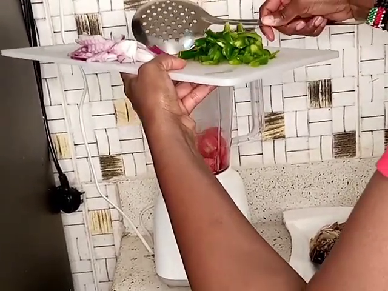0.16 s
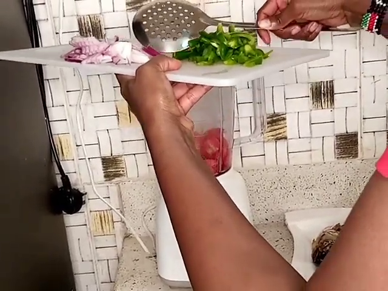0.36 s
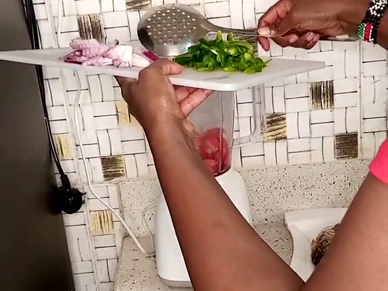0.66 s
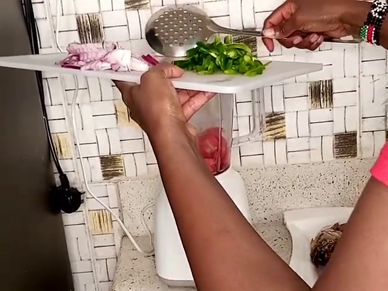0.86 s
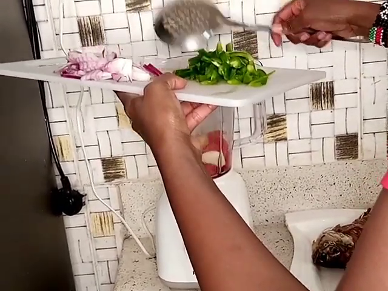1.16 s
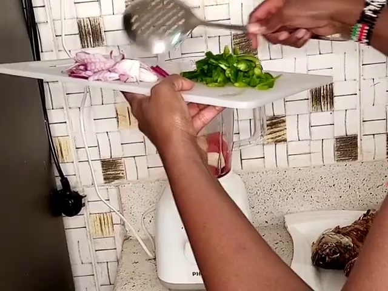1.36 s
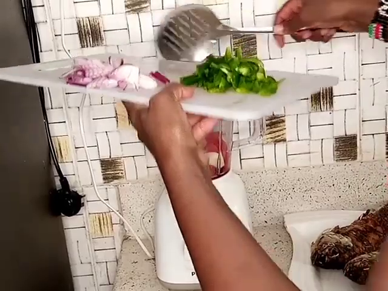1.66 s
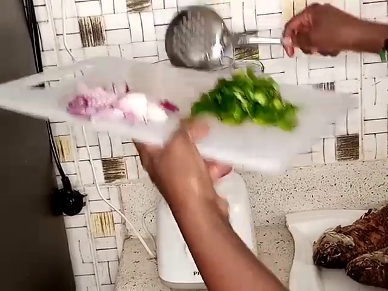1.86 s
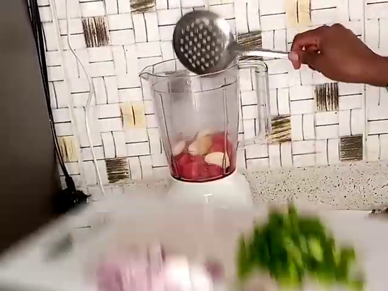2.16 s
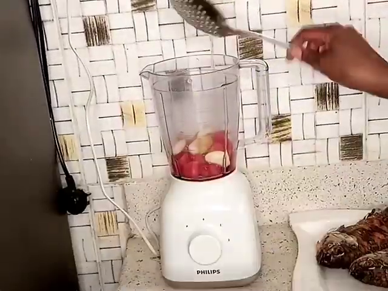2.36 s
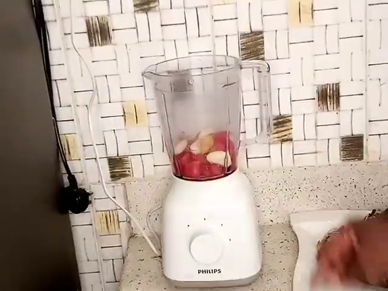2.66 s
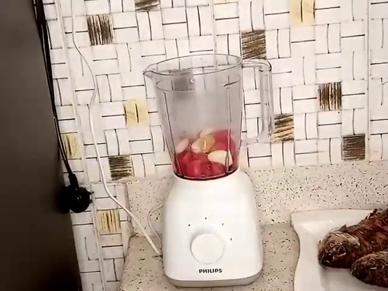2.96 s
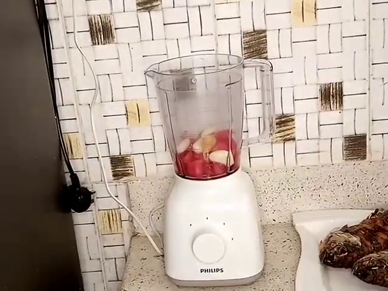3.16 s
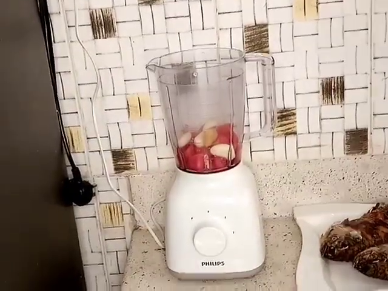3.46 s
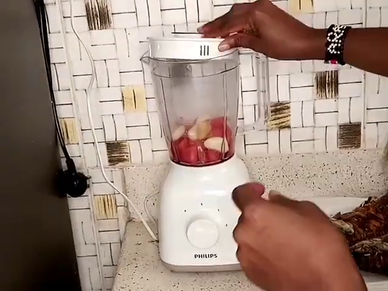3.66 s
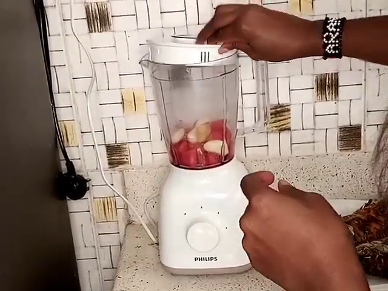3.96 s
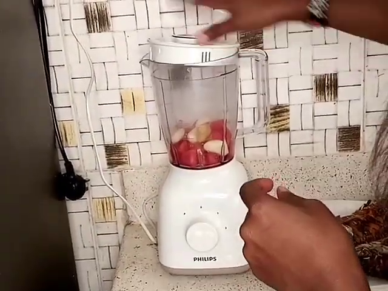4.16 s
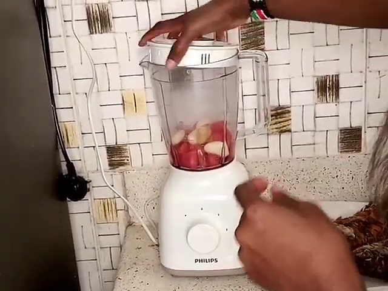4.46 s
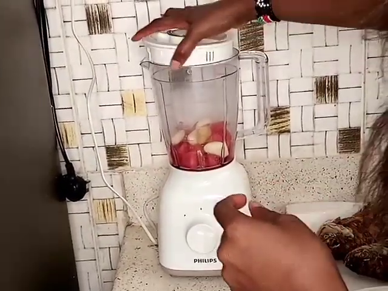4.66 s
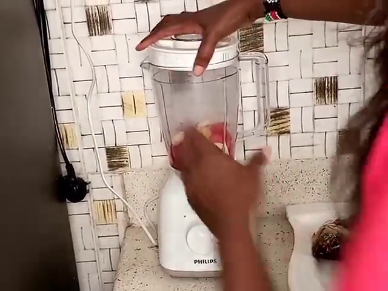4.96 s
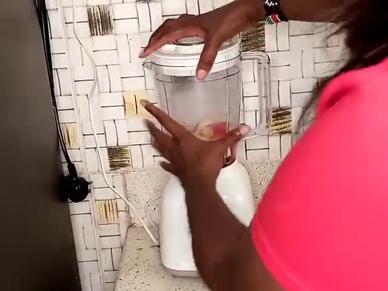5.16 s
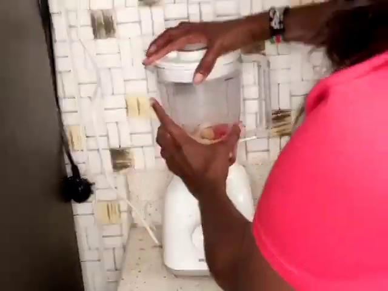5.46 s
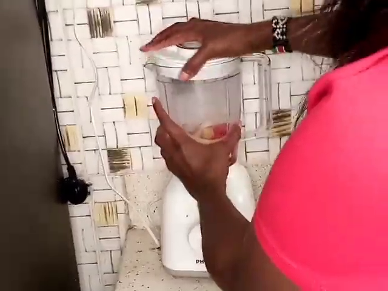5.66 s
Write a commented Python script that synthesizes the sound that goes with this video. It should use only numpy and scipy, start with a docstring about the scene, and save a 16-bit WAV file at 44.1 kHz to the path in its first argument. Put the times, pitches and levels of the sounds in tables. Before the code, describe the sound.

Gritty scrapes and ringing steel, sharp counter knocks, hollow lid fumbling and booms, a tiny silence, then a loud blender at full speed.

```python
"""A steel skimmer pushes chopped vegetables off a plastic board into a blender jar in a small tiled kitchen:
friction grit excites hiss, board modes and singing steel, and food ticks on the jar wall. Board and skimmer
are put down as impulses into damped modes; the lid is picked up and pressed on and the jar gripped, with
rustling noise and a booming air column. After a short silent gap the motor is already at full speed: shaft
orders over throbbing noise. Before the gap, room tone, hum and a diffuse tail lie beneath."""
import sys
import numpy as np
from scipy import signal
from scipy.fft import rfft, irfft
from scipy.io import wavfile

SR = 44100
rng = np.random.default_rng(int(sys.argv[2]) if len(sys.argv) > 2 else 0)


def wrap_up_sound(samples):
    """Save the sound to the file named by the first command line argument, as 16-bit audio."""
    columns = np.atleast_2d(samples).T
    # keep every value between -1 and 1, then stretch to whole-number steps
    tamed = np.clip(columns, -1, 1)
    steps = np.round(tamed * 32767).astype(np.int16)
    wavfile.write(sys.argv[1], SR, steps)


N = 256662
T = np.arange(N) / SR
STEP = 16   # samples between points of a coarse envelope
GAP_START_S, MOTOR_START_S = 5.638, 5.664   # silence lies between these times


def amp(db):
    """Decibel definition: amplitude ratio of a level difference."""
    return 10 ** (np.asarray(db) / 20)


def rms_one(x):
    """Power normalisation: scales x to an rms of 1."""
    return x / np.sqrt(np.mean(x ** 2) + 1e-20)


def at_hz(points, hz):
    """Logarithmic frequency scale: interpolates a table of (f/Hz, value)."""
    f, value = np.array(points).T[:2]
    return np.interp(np.log(hz + 1), np.log(f), value)


def coloured(x, spectrum):
    """Linear filtering: weights the spectrum of x by a table; rms 1."""
    hz = np.fft.rfftfreq(N, 1 / SR)
    return rms_one(irfft(rfft(x) * amp(at_hz(spectrum, hz)), N))


def grit(per_s, spread_db):
    """Stick-slip friction: random uneven clicks of two surfaces catching on each other."""
    size_db = spread_db * np.minimum(rng.exponential(1, N), 4)
    sizes = amp(size_db) * rng.choice([-1, 1], N)
    return sizes * (rng.random(N) < per_s / SR)


def drift(rate):
    """Low-pass random process: slow chance of about the given rate in Hz, spread 1."""
    r = np.exp(-2 * np.pi * rate / SR)
    slow = signal.lfilter([1], [1, -2 * r, r * r], rng.standard_normal(N + SR))
    return rms_one(slow[SR:])   # the settling of the filter is left out


def resonances(x, peaks, waver_db=0., rate=9.3):
    """Modal superposition: parallel resonances that waver independently in level; rms 1."""
    out = 0
    for k, (hz, width, db) in enumerate(peaks):
        r = np.exp(-np.pi * width / SR)
        poles = [1, -2 * r * np.cos(2 * np.pi * hz / SR), r * r]
        mode = rms_one(signal.lfilter([1, 0, -1], poles, x))
        out = out + (-1) ** k * amp(db + waver_db * drift(rate)) * mode   # alternating signs
    return rms_one(out)


def narrow(hz, width_hz, size=N):
    """Amplitude modulation: slow complex noise on a carrier whose pitch may move; rms 1."""
    r = np.exp(-np.pi * width_hz / SR)
    slow = signal.lfilter([1], [1, -2 * r, r * r], rng.standard_normal((2, size + 2000)))[:, 2000:]
    phase = 2 * np.pi * np.cumsum(hz * np.ones(size)) / SR
    return rms_one(slow[0] * np.cos(phase) + slow[1] * np.sin(phase))


def patchy(x, patchy_db, rate):
    """Subband modulation: half-octave bands swell and fade independently; rms 1."""
    edges = 350 * 2 ** np.arange(0, 6, .5)
    out = 0
    for k, (low, high) in enumerate(zip(edges, edges[1:])):
        band = signal.sosfilt(signal.butter(2, [low, high], "band", fs=SR, output="sos"), x)
        out = out + (-1) ** k * band * amp(patchy_db * drift(rate))   # signs avoid gaps between bands
    return rms_one(out)


def swells(s, db, rise_s, fall_s):
    """Exponential growth and decay: one coarse gain row per event, times being those per 20 dB."""
    late = T[::STEP] - s[:, None]
    drop = np.maximum(-late / rise_s[:, None], late / fall_s[:, None])
    return amp(db[:, None] - 20 * np.minimum(drop, 8))


def fine(coarse):
    """Linear interpolation: brings a coarse envelope to full rate."""
    return np.interp(T, T[::STEP], coarse)


# skimmer pressure in each stroke over the board, as a list per stroke: [t/s, relative hiss level/dB]
DRAG_PRESSURE = [
    [(0.139, -52), (0.237, -51.5), (0.345, -62), (0.473, -72), (0.483, -68)],
    [(0.489, -60), (0.509, -64), (0.571, -56.5), (0.819, -49.5), (0.947, -55.5), (0.966, -49)],
    [(0.972, -40), (1.002, -51), (1.038, -48.5), (1.13, -70)],
    [(1.459, -35.5), (1.497, -42), (1.563, -29.5), (1.6, -29), (1.643, -32.5), (1.72, -49), (1.84, -75)],
]
# colour of each stroke: [board drone relative level/dB, extra drone level on landing/dB,
# steel ring relative level/dB]
STROKE_COLOURS = [(9, -8, -1), (8, 7, 1), (5, 0.1, 0.1), (-13, 24, -3)]
# vibration modes of the plastic board, also rung by the board taps: [f/Hz, relative level/dB, t60/s]
BOARD_MODES = [(220, -4.5, 0.2), (283, -3.5, 0.17), (441, -3, 0.18), (552, -2, 0.077), (733, -1, 0.45),
               (1041, -5.5, 0.11), (1309, -3.5, 0.037), (1976, -14.5, 0.091), (4080, 2, 0.021),
               (5800, 6, 0.017)]
# singing modes of the steel skimmer: [f/Hz, width/Hz, relative level/dB]
SKIMMER_MODES = [(3010, 49, -14), (3460, 40, -13), (4190, 120, -6), (4450, 120, -6), (5800, 90, -9),
                 (6370, 90, -8), (7076, 20, 0), (8100, 25, -10), (8610, 41, -14), (10100, 22, -1),
                 (11100, 60, -12), (12500, 30, -13), (12800, 35, -14), (13300, 40, -13)]
# spectrum of the scraping hiss: [f/Hz, relative level/dB]
DRAG_HISS_SPECTRUM = [(300, -50), (900, -2), (2000, -0.5), (3000, -4), (4500, 0.5), (6500, -1.5),
                      (9600, -7), (11500, -14), (12900, -10), (14000, -11), (15600, -4.5)]
# spectrum of dull rubbing, also heard in handling: [f/Hz, relative level/dB]
DULL_SPECTRUM = [(350, -22.5), (500, 4), (1000, 2.5), (2200, -2), (3000, -25.5)]


def drags():
    """Friction excitation: dense grit drives broad hiss, the skimmer's modes and the board's low modes."""
    points = np.concatenate(DRAG_PRESSURE)
    touching = sum((T >= stroke[0][0]) & (T <= stroke[-1][0]) for stroke in DRAG_PRESSURE) > 0
    gain = touching * amp(np.interp(T, points[:, 0], points[:, 1]))

    starts = np.array([stroke[0][0] for stroke in DRAG_PRESSURE])
    which = np.clip(np.searchsorted(starts, T) - 1, 0, None)
    since = np.maximum(T - starts[which], 0)
    drone_db, landing_db, ring_db = np.array(STROKE_COLOURS)[which].T
    drone_db = drone_db + landing_db * np.exp(-since / .05)   # the landing drone dies away
    ring_db = ring_db - 14 * np.exp(-since / .035)   # the steel takes time to sing

    rub = grit(12000, spread_db=2.5)
    middle_modes = [(hz, 35, db) for hz, db, t60 in BOARD_MODES if 500 < hz < 2500]
    low_modes = [(hz, 60, db) for hz, db, t60 in BOARD_MODES if hz < 500]
    drone = amp(-5.0) * resonances(rub, middle_modes, waver_db=2.5)
    drone += amp(-15) * coloured(rub, DULL_SPECTRUM)
    drone += amp(-9) * resonances(rub, low_modes, waver_db=2.5)
    hiss = coloured(rub * amp(1.3 * drift(26)), DRAG_HISS_SPECTRUM)

    # the steel rings on when pressure eases: it takes 0.7 of the dB swing about -52 dB
    ring_gain = amp(-52 + ring_db) * (gain / amp(-52)) ** .7
    ring = ring_gain * resonances(rub, SKIMMER_MODES, waver_db=2.4, rate=7.1)
    # the board's body tone only speaks under hard pressure: 2.4 times the dB swing about -29 dB
    tone_gain = amp(-35) * (gain / amp(-29)) ** 2.4
    tone = tone_gain * narrow(1095, width_hz=136)
    return amp(-3.5) * (gain * (hiss + amp(drone_db) * drone) + ring + tone)


# shaft orders: [multiple of shaft speed, level/dB relative to a sine of rms 1]
SHAFT_ORDERS = [(1, -33), (2, -33), (3, -46), (6, -45), (12, -40.5), (24, -36), (36, -37.5)]
# spectrum of the churning noise: [f/Hz, relative level/dB]
CHURN_SPECTRUM = [(15, -60), (25, -34), (87, -40), (242, -18), (285, -10.5), (373, -18), (531, -15),
                  (575, -18), (695, -19), (1700, -13.5), (1940, -11), (3080, -14.5), (6920, -14.5),
                  (7920, -17.5), (16000, -19)]
# motor housing and jar resonances: [f/Hz, width/Hz, relative level/dB]
HOUSING_MODES = [(1935, 30, -4), (2787, 14, -7), (3327, 16, -9), (4133, 14, -8), (5767, 25, -6),
                 (6550, 22, -3), (6900, 300, 5), (7060, 30, -6), (10270, 100, -6)]


def motor():
    """Rotating machinery: shaft orders (unbalance, blades, commutator bars) over noise throbbing once a turn."""
    shaft_hz = 284.2 * (1 + 0.00287 * drift(17.1))
    turns = np.cumsum(shaft_hz) / SR
    tones = 0
    for order, db in SHAFT_ORDERS:
        wave = np.sin(2 * np.pi * (order * turns + rng.random()))
        tones = tones + np.sqrt(2) * amp(db + 1.8 * drift(37)) * wave
    tones += amp(-38.5) * narrow(2006, width_hz=16)   # steady whine, no multiple of the shaft speed
    throb = 1 + 0.25 * np.cos(2 * np.pi * turns)
    chop = grit(16000, spread_db=0.0) * throb * amp(1.86 * drift(45))
    housing = resonances(grit(9000, spread_db=1.5) * throb, HOUSING_MODES)
    churn = coloured(chop, CHURN_SPECTRUM) + amp(-8.5) * housing
    return tones + amp(-21.5) * churn


def blows(events, modes, ring_db, crack_db, crack_s=0.002):
    """Impulse response: each blow rings damped modes and adds a short noise crack in each range."""
    s, treble_db, middle_db, bass_db = np.transpose(events)
    at, out = (s * SR).astype(int), np.zeros(N)
    by_range = {(150, 600): treble_db + bass_db, (600, 2500): treble_db + middle_db, (2500, 15000): treble_db}
    for (low, high), db in by_range.items():
        clicks = np.full(N, 1e-18)
        clicks[at] = amp(db)
        fall = np.exp(-1 / (crack_s * SR * np.sqrt(2500 / low)))   # bass cracks last longer
        burst = signal.lfilter([1], [1, -fall], clicks) * rng.choice([-1, 1], N)
        band = signal.butter(3, [low, high], "band", fs=SR, output="sos")
        bandwidth_gain = np.sqrt(SR / 2 / (high - low))
        out += amp(crack_db) * bandwidth_gain * signal.sosfilt(band, burst)
        for hz, mode_db, t60 in modes:
            if low <= hz < high:
                r, w = amp(-60 / (t60 * SR)), 2 * np.pi * hz / SR
                uneven_db = rng.normal(0, 2, len(at))   # each blow excites a mode differently
                clicks[at] = amp(db + mode_db + ring_db + uneven_db)
                out += signal.lfilter([0, np.sin(w)], [1, -2 * r * np.cos(w), r * r], clicks)
    return out


# all tap tables: [t/s, treble reference level/dB, middle relative level/dB, bass relative level/dB]
# all mode tables: [f/Hz, relative level/dB, t60/s]
# blows on the board
BOARD_BLOWS = [(0.1402, -45, -0.5, -0.5), (0.4866, -49, -1, 10), (0.9694, -37.5, -17, 3),
               (1.251, -58.5, 6.5, 12.5), (1.4569, -34, -1.5, -0.5)]
# a blow on the rim, and the rim's modes
RIM_BLOWS = [(2.0582, -27.5, 4, -2.5)]
RIM_MODES = [(524, -3, 0.17), (543, -3, 0.13), (688, -2, 0.19), (1110, -10, 0.042), (1214, 3, 0.069),
             (1265, 3, 0.054), (1340, -4, 0.054), (1750, -8, 0.085), (2930, -24, .02), (4220, 7.5, 0.016),
             (5540, 5, 0.026)]
# blows on the counter, and the counter's modes
COUNTER_BLOWS = [(2.644, -31.5, -33.5, -18), (2.886, -12, -49, -46.5), (2.8873, -17.5, -18, -38),
                 (2.9316, -9, -25, -43), (2.9389, -14.5, -28, -41)]
COUNTER_MODES = [(330, 0, .1), (650, -13, .12), (715, 1.5, 0.18), (757.5, 6, 0.19), (1370, -2, .05),
                 (2980, -18, .006), (4830, -14.5, .005), (6830, 1.5, 0.011), (9000, 2.5, 0.006)]
# small bright ticks of food dropping into the jar, and the modes of the jar wall
FOOD_DROPS = [(1.1456, -47.5, -42, -40), (1.1563, -43, -40, -42), (1.1856, -42, -38, -40),
              (1.2207, -49, -18, -47), (1.2844, -58, -40, -42)]
JAR_WALL_MODES = [(4530, -7, .012), (5350, 0.5, 0.015), (6400, 4, .012), (7640, -2, .012),
                  (8900, -11, .012)]
# blows as the lid is picked up, and the modes of the loose lid
PICKUP_BLOWS = [(3.3443, -38, -5, -12), (3.3572, -33.5, 8, -22.5), (3.3823, -24.5, -15.5, -17),
                (3.493, -13.5, -24, -20.5)]
LOOSE_LID_MODES = [(315, -2, 0.14), (980, -7, 0.029), (1030, 2, 0.044), (1150, -10, 0.058),
                   (1406, -1.5, 0.14), (2090, -14.5, 0.045), (3140, -2, 0.011), (5740, 0.5, 0.012),
                   (7100, -14.5, 0.0091)]
# blows on the lid as it is pressed on, and its modes
LID_BLOWS = [(3.7549, -43, -11, -9.5), (3.966, -45.5, -10.5, -7), (4.1783, -43, -19, -6.5),
             (4.2427, -56, -5, 11), (4.271, -45.5, -8.5, -6.5), (4.4805, -54, -24, -21),
             (4.5062, -41.5, -28.5, -6.5), (4.5307, -28.5, -7.5, -16), (4.5729, -35, -12, -22),
             (4.6725, -34, -18, -5.5), (4.8064, -42, 10.5, -13), (4.8857, -35, 4, -5),
             (4.9046, -35.5, -0.5, 1.5), (5.03, -32.5, -12, -12.5), (5.1898, -42.5, -18, -2.5),
             (5.2728, -40, -4.5, -8), (5.3848, -45.5, -8, -2.5)]
LID_MODES = [(255, 3.5, 0.14), (284.3, -6.5, 0.069), (390, 0.5, 0.22), (630, -2.5, 0.071),
             (1048, -12, 0.063), (1410, -14, 0.26), (1637, -15, 0.072), (2110, -19, 0.031),
             (3610, -13, 0.011), (4790, -4.5, 0.021), (6100, -10, 0.06)]


def knocks():
    """Impact excitation: every struck body answers with its own modes."""
    out = blows(BOARD_BLOWS, BOARD_MODES, ring_db=-10, crack_db=-2.5)
    out += blows(RIM_BLOWS, RIM_MODES, ring_db=-14, crack_db=-8.5)
    out += blows(COUNTER_BLOWS, COUNTER_MODES, ring_db=-9, crack_db=-5.5, crack_s=.0012)
    out += blows(FOOD_DROPS, JAR_WALL_MODES, ring_db=-11, crack_db=-11.5, crack_s=.004)
    out += blows(PICKUP_BLOWS, LOOSE_LID_MODES, ring_db=-10, crack_db=-6.5, crack_s=0.0017)
    out += blows(LID_BLOWS, LID_MODES, ring_db=-10, crack_db=-7.5, crack_s=0.0032)
    return out


# things set down or pressed home rustle on: [t/s, relative level/dB, first snap above it/dB,
# time to fall 20 dB/s, duller part relative level/dB]
SETTLING = [(1.15, -63, 3, .18, -8), (2.063, -44, 13, .14, 5), (2.648, -52, 20, .12, 7),
            (2.891, -25, 1.5, .15, -13), (2.935, -25, 1.5, .135, -6), (3.498, -44, 19, .18, 8),
            (4.184, -70, 22, .1, 5), (4.535, -45, 5, .045, -7), (4.678, -50, 11, .15, 4),
            (4.811, -41, 3, .035, 8), (5.034, -49, 3, .3, -5), (5.278, -53.5, 14, .33, -3)]
# hands, food and tools sliding: [t of peak/s, relative level/dB, time to rise 20 dB/s,
# time to fall 20 dB/s, duller part relative level/dB]
SLIDING = [(1.284, -64, .08, .04, 4), (2.387, -74, .1, .3, 10), (2.63, -69, .1, .02, 1),
           (2.836, -59, .07, .2, -10), (3.34, -53, .09, .02, -10), (3.393, -29.5, .022, .045, -2),
           (3.44, -44.5, .06, .2, 1), (3.76, -62, .1, .4, -4), (3.92, -62, .04, .08, -8),
           (3.978, -61, .1, .08, -1), (4.09, -59, .12, .14, -12), (4.304, -59, .17, .14, -5),
           (4.52, -52, .06, .02, -20), (4.655, -47.5, .065, .03, -10), (4.9, -41, .05, .1, 4),
           (5.266, -54, .15, .01, -5), (5.54, -64, .15, .1, -25), (5.635, -55, .07, .05, -20)]
# spectrum of the rustle: [f/Hz, relative level/dB]
RUSTLE_SPECTRUM = [(1180, -26.5), (2000, -8), (3520, -5.5), (3710, -6), (4450, -1), (6590, -2.5),
                   (9660, -9), (13600, -16), (14900, -14.5), (16000, -30)]
# hollow plastic and steel ware that rings faintly, also in the air hiss: [f/Hz, width/Hz, relative level/dB]
WARE_MODES = [(637, 32, -2), (906, 100, 0), (1096, 40, -1.5), (1377, 22, -1), (1640, 89, -0.5),
              (1900, 40, -2), (2127, 35, -7.5), (2290, 150, -9.5), (2720, 44, -2.5), (3070, 50, -6),
              (3280, 32, -10.5), (6300, 40, -17)]


def rustling():
    """Sliding friction: patchy rustle of skin and food on plastic over hollow ringing ware."""
    s, db, snap_db, fall_s, settle_dull_db = np.transpose(SETTLING)
    rise_s, snap_fall_s = np.full(len(s), .004), np.full(len(s), .009)
    snaps = swells(s, db + snap_db, rise_s, snap_fall_s)
    *slides, slide_dull_db = np.transpose(SLIDING)
    rows = np.vstack([swells(s, db, rise_s, fall_s), swells(*slides)])
    dull_rows = amp(np.concatenate([settle_dull_db, slide_dull_db]))[:, None] * rows
    gain = fine(rows.max(axis=0) + snaps.sum(axis=0))
    dull_gain = fine(dull_rows.max(axis=0))

    rub = grit(13000, spread_db=0.5) * amp(2.1 * drift(25))
    slide = grit(6000, spread_db=1.0)
    bright = coloured(patchy(rub, patchy_db=0.95, rate=7.4), RUSTLE_SPECTRUM)
    hollow = amp(-6) * coloured(slide, DULL_SPECTRUM)
    hollow += amp(-7.5) * resonances(slide, WARE_MODES, waver_db=4.0, rate=2.7)
    return amp(-4.5) * (gain * bright + dull_gain * hollow)


# booms of the jar air when handled, pitch set by how far the lid closes it: [t of peak/s,
# relative level/dB, time to rise 20 dB/s, time to fall 20 dB/s, f/Hz]
JAR_BOOMS = [(3.47, -46, .04, .15, 368), (3.56, -34, .12, .06, 315), (3.64, -56, .05, .25, 300),
             (3.77, -48.5, .03, .23, 294), (3.98, -53, .15, .07, 272), (4.25, -42, .05, .13, 276),
             (4.54, -46, .07, .065, 313), (4.66, -39, .02, .15, 357), (4.812, -34, .01, .05, 355),
             (4.91, -28.5, .03, .09, 304), (5.04, -34, .022, .06, 312), (5.16, -50.5, .04, .2, 252),
             (5.39, -50, .055, .2, 249), (5.62, -59, .12, .02, 280)]
# fixed resonances of the jar air: [f/Hz, width/Hz, relative level/dB]
JAR_AIR_MODES = [(232, 83, -9), (261, 22, 4), (307, 39, 1), (365, 33, 0), (400, 38, -3)]


def jar_air():
    """Cavity resonance: noise rings the jar's air column, the strongest boom setting its pitch."""
    *shape, hz = np.transpose(JAR_BOOMS)
    booms = swells(*shape)
    gain = fine(booms.max(axis=0))
    air_hz = fine(hz[booms.argmax(axis=0)])
    steady = resonances(rng.standard_normal(N) * amp(8.7 * drift(46)), JAR_AIR_MODES)
    moving = narrow(air_hz, width_hz=55)
    return amp(-3) * gain * (amp(-0.5) * moving + amp(-4) * steady)


# reverberation time of the kitchen: [f/Hz, t60/s]
KITCHEN_T60 = [(100, 0.43), (1000, 0.42), (6000, 0.3), (15000, .25)]


def kitchen(x):
    """Diffuse reverberation: octave bands of noise, each decaying at its own rate."""
    t, tail = T[:SR], 0
    for hz in 88 * 2. ** np.arange(8):
        band = signal.butter(2, [hz / np.sqrt(2), hz * np.sqrt(2)], "band", fs=SR, output="sos")
        decay = amp(-60 * t / at_hz(KITCHEN_T60, hz))
        tail = tail + signal.sosfilt(band, rng.standard_normal(SR)) * decay
    tail = tail * np.minimum(t / 0.0013, 1)   # reflections build up over 1.3 ms
    return signal.fftconvolve(x, tail / np.sqrt(np.sum(tail ** 2)))[:N]


# faint narrow tones in the quiet gaps: [start t/s, stop t/s, f/Hz, level/dB]
QUIET_TONES = [(0, 0.115, 3150, -78), (1.251, 1.323, 1650, -66), (1.245, 1.313, 2110, -71),
               (1.25, 1.3, 3500, -71), (1.263, 1.341, 920, -65.5), (1.326, 1.455, 1570, -75),
               (1.344, 1.44, 3280, -80), (1.938, 1.993, 1910, -72), (1.986, 2.034, 1340, -71),
               (2.293, 2.517, 1600, -86), (2.38, 2.48, 6460, -84), (2.786, 2.88, 2260, -77),
               (3.736, 4.03, 2100, -74.5), (3.898, 4.122, 630, -72), (4.024, 4.153, 3040, -78),
               (3.749, 4.12, 6530, -74), (4.114, 4.271, 2007, -80), (5.547, 5.628, 700, -69.5)]


def faint_tones():
    """Narrow-band noise: short tones that swell and fade."""
    out = np.zeros(N)
    for start, stop, hz, db in QUIET_TONES:
        a, b = int(max(start, 0) * SR), int(stop * SR)
        out[a:b] += amp(db) * np.sqrt(np.hanning(b - a)) * narrow(hz, width_hz=47, size=b - a)
    return out


# spectrum of the low room tone: [f/Hz, relative level/dB]
ROOM_SPECTRUM = [(15, -65), (25, -11), (48, -33), (97, 4), (194, 8), (253, -3), (312, 16.5), (454, -19),
                 (700, -7.5), (910, -61), (1540, -120)]
# steady low hum: [f/Hz, width/Hz, relative level/dB]
HUM_MODES = [(101, 5, -6), (206, 31, -1.5), (333, 22, -2.5)]
# spectrum of the air hiss: [f/Hz, relative level/dB]
AIR_SPECTRUM = [(400, -9), (700, 2.5), (2000, -11), (3500, -10.5), (5500, -5.5), (8000, -8.5), (12000, -12),
                (15500, 1)]


def background():
    """Stationary noise: shaped room tone, resonant hum and a patchy air hiss."""
    room = amp(-66.5) * coloured(rng.standard_normal(N), ROOM_SPECTRUM) * amp(0.5 * drift(18))
    hum = amp(-63) * resonances(rng.standard_normal(N), HUM_MODES, waver_db=-2.5)
    hiss = coloured(patchy(rng.standard_normal(N), patchy_db=5.5, rate=5.2), AIR_SPECTRUM)
    hiss += amp(-4) * resonances(rng.standard_normal(N), WARE_MODES, waver_db=6.0, rate=5)
    return room + hum + amp(-79.5 + 3.6 * drift(2.3)) * hiss


def scene():
    """Superposition: preparation and its reverberation up to the silent gap, the motor after it."""
    impacts = knocks()
    rubs = drags() + rustling() + jar_air()
    reverberation = kitchen(amp(-2) * impacts + amp(-10) * rubs)
    before = impacts + rubs + reverberation + background() + faint_tones()
    dip = np.sin(np.pi * np.clip((T - 0.1) / (0.137 - 0.1), 0, 1))
    before = before * amp(-11 * dip)   # the level dips briefly
    running = np.clip((T - MOTOR_START_S) / 0.0017, 0, 1) ** 2
    return (before * (T < GAP_START_S) + running * motor())[None]


# frequency response of the microphone: [f/Hz, relative level/dB]
MICROPHONE_RESPONSE = [(20, -24), (90, -2), (150, 0), (4000, 0), (6500, 2), (10000, -3), (12500, -9),
                       (13800, -11), (15000, -2), (15700, 0)]


def record(dry):
    """Minimum-phase filtering: causal microphone colour, silence in the gap, then a top cut at 15.75 kHz."""
    gain = amp(at_hz(MICROPHONE_RESPONSE, np.fft.rfftfreq(8192, 1 / SR)))
    cepstrum = irfft(np.log(gain))
    cepstrum[1:4096] *= 2   # folding the cepstrum makes the filter causal
    response = irfft(np.exp(rfft(cepstrum[:4097], 8192)))
    heard = signal.fftconvolve(dry, response[None])[:, :N]
    heard = heard * ((T < GAP_START_S) | (T > MOTOR_START_S))
    top_cut = signal.ellip(10, 1, 60, 15750, fs=SR, output="sos")
    return signal.sosfilt(top_cut, heard)


dry = scene()
out = record(dry)
wrap_up_sound(out)
```